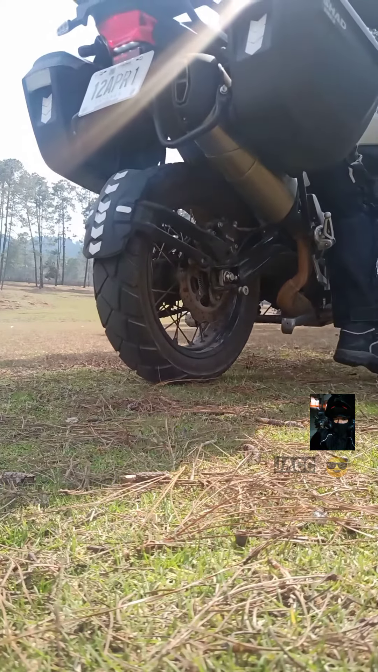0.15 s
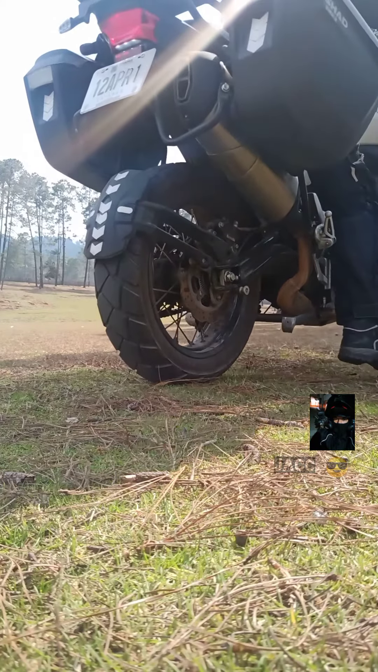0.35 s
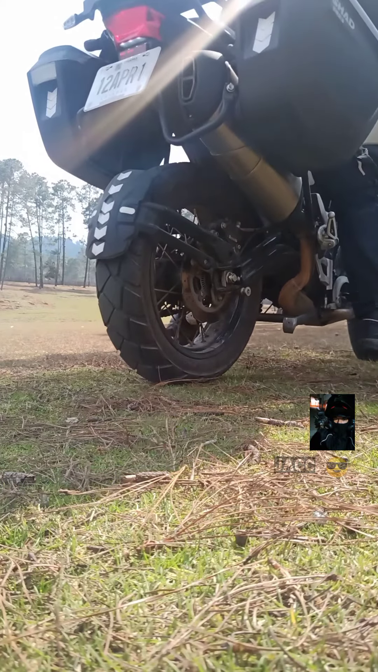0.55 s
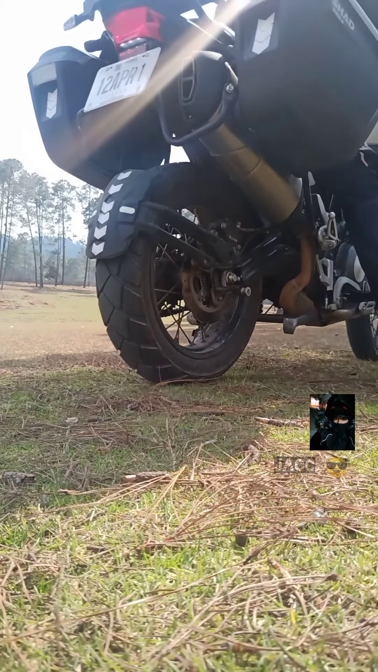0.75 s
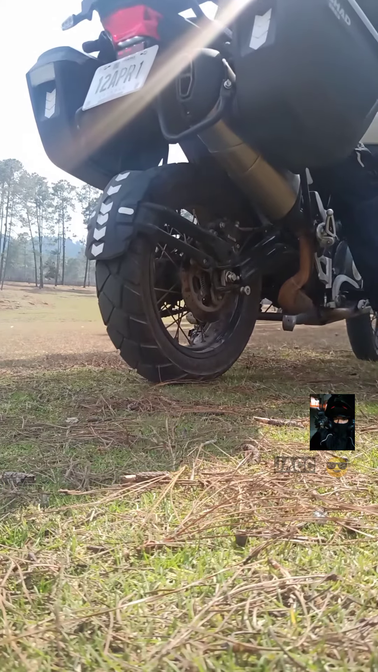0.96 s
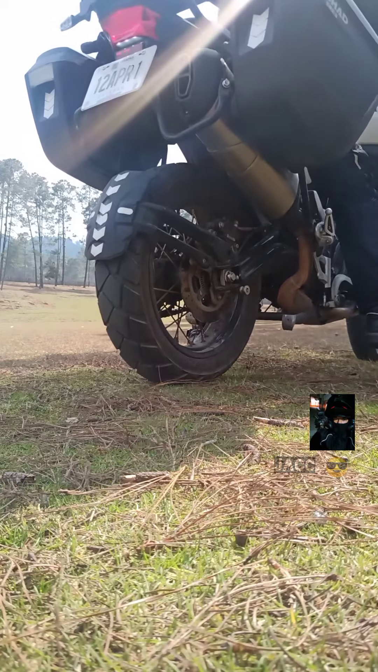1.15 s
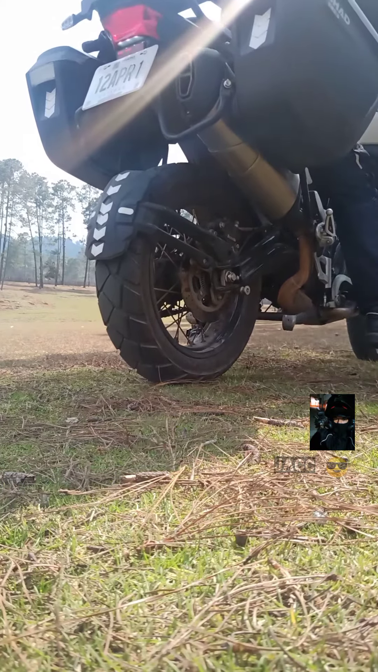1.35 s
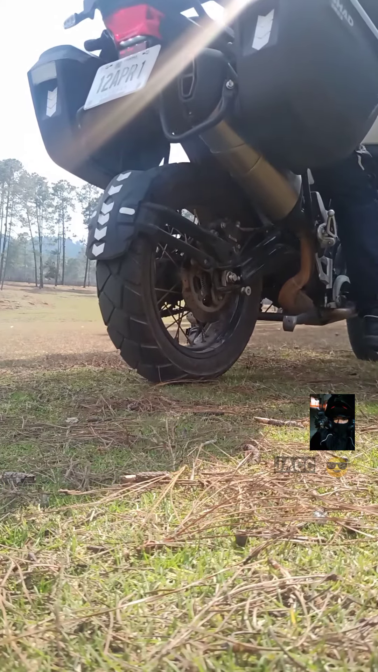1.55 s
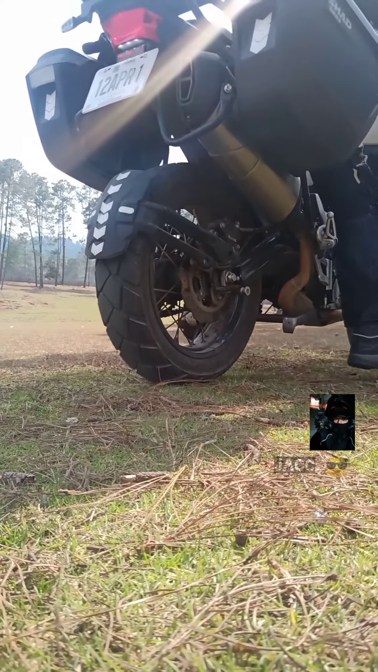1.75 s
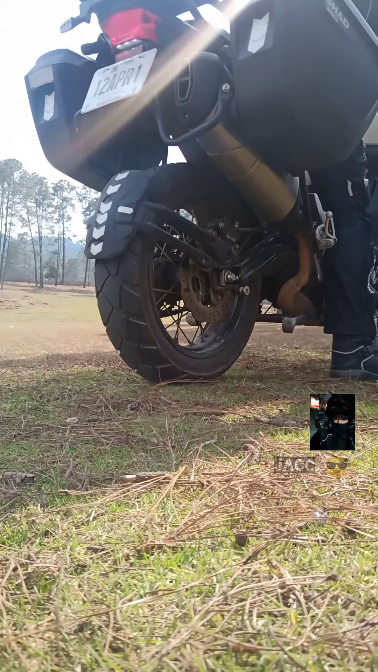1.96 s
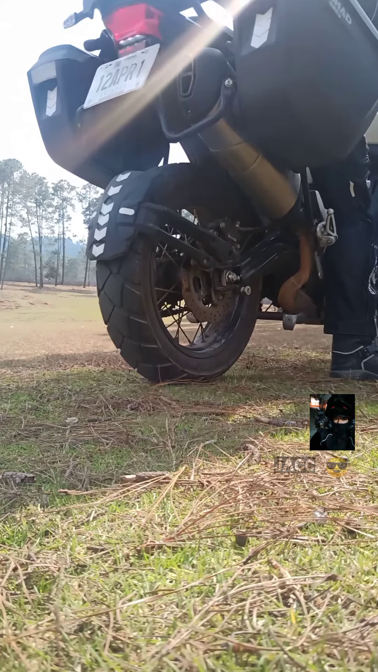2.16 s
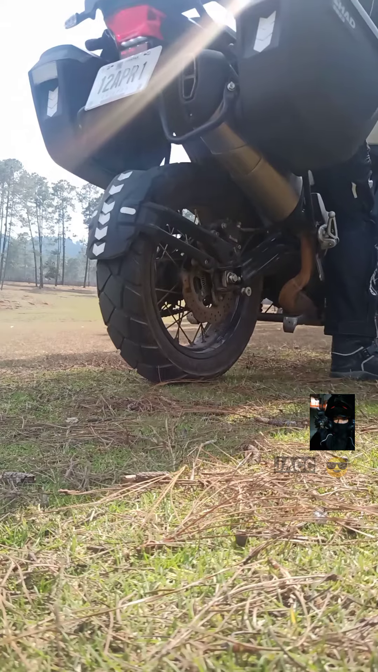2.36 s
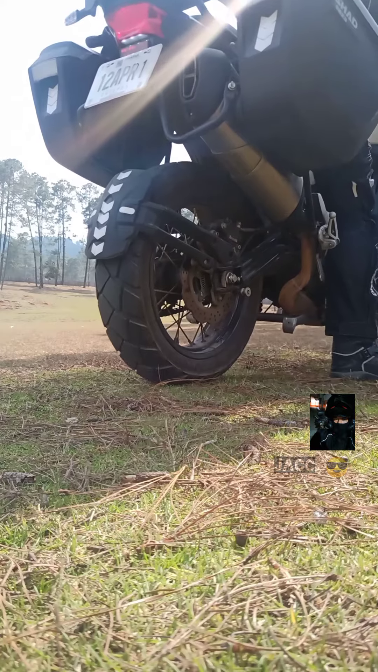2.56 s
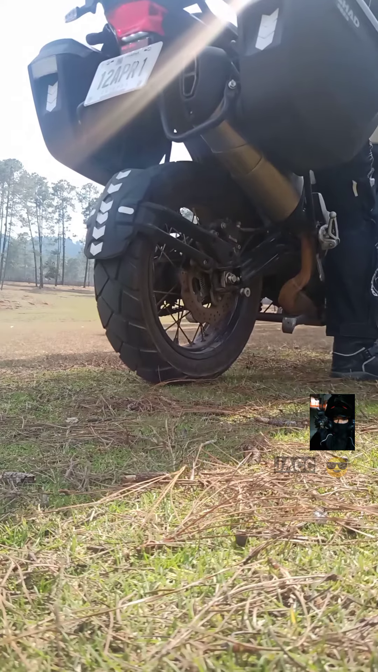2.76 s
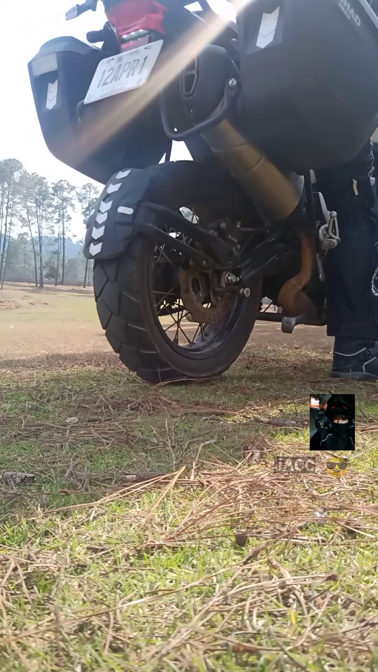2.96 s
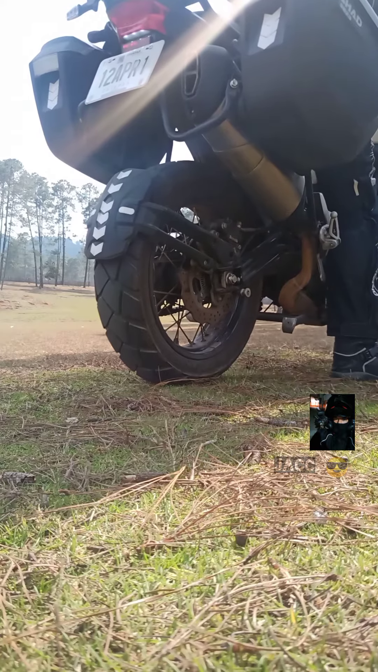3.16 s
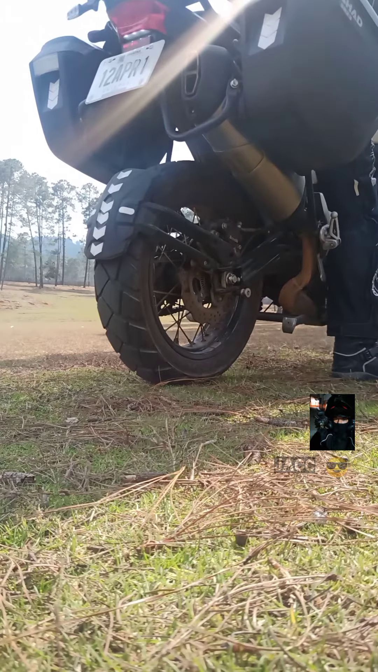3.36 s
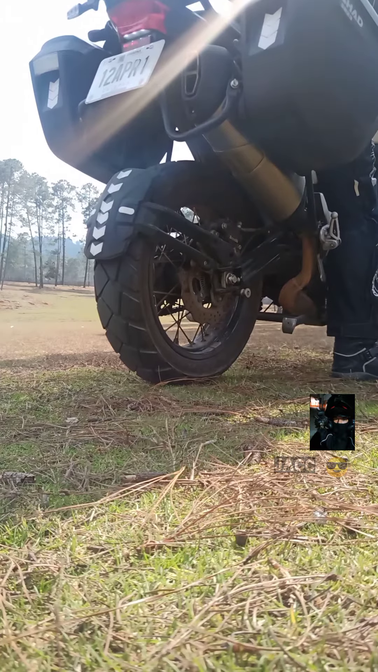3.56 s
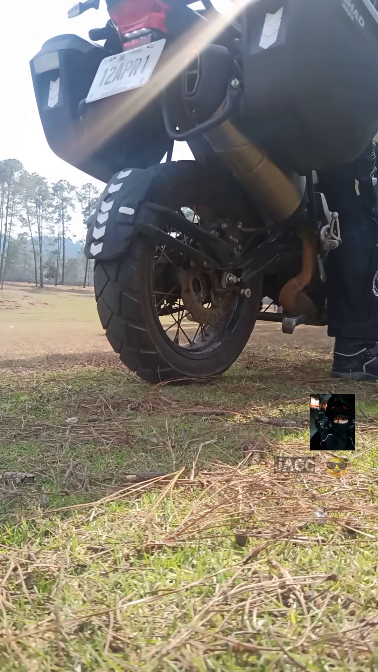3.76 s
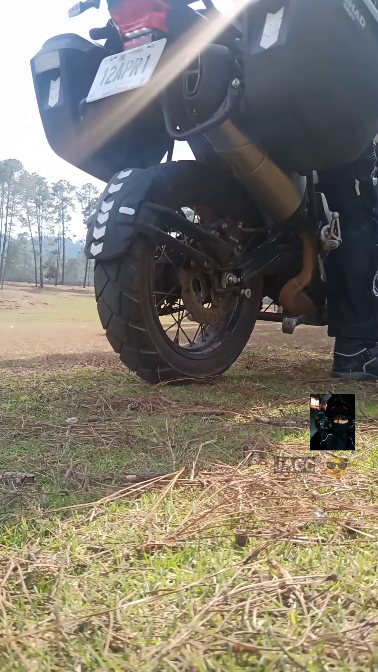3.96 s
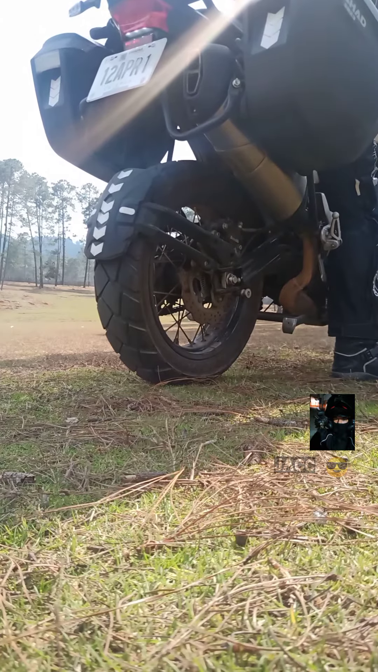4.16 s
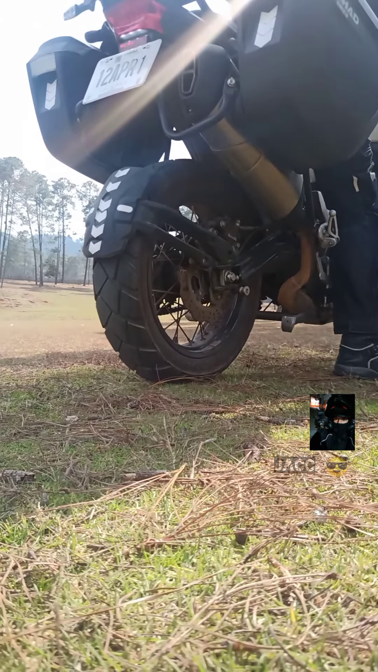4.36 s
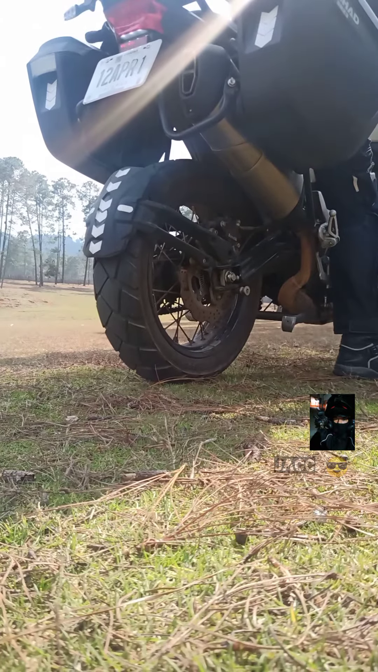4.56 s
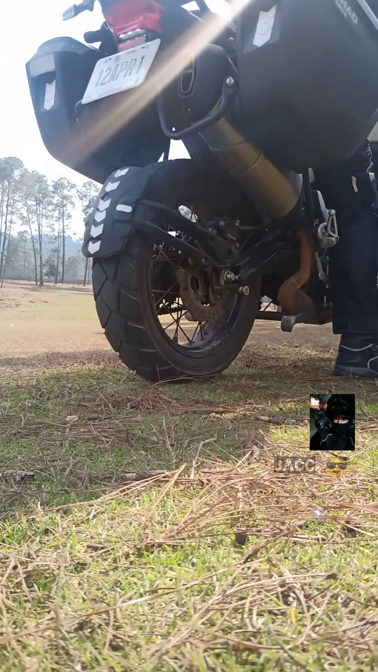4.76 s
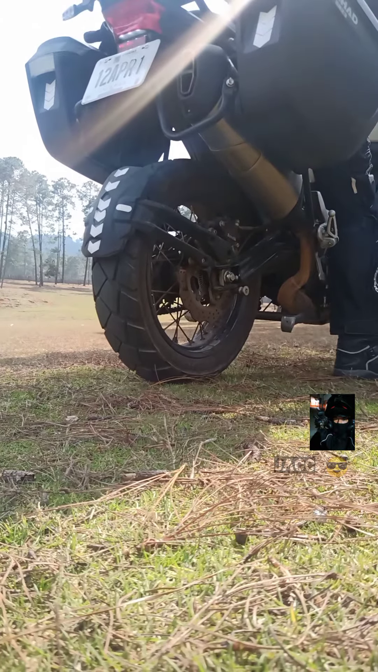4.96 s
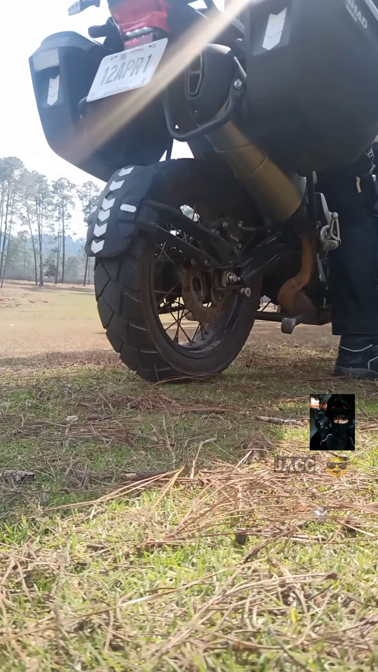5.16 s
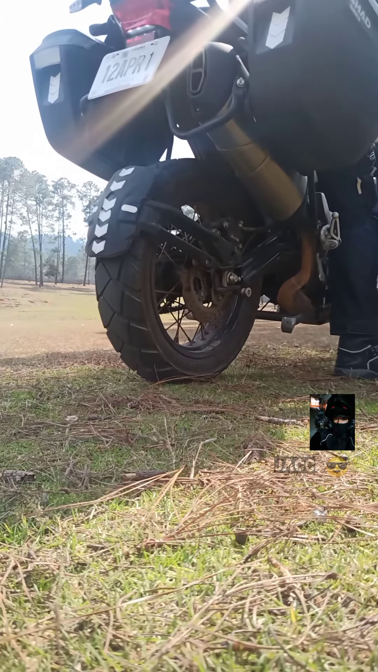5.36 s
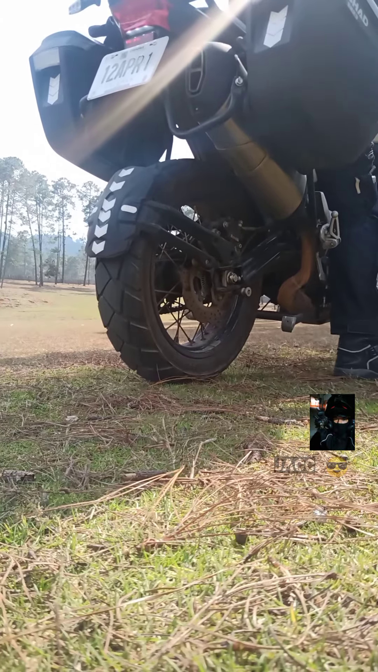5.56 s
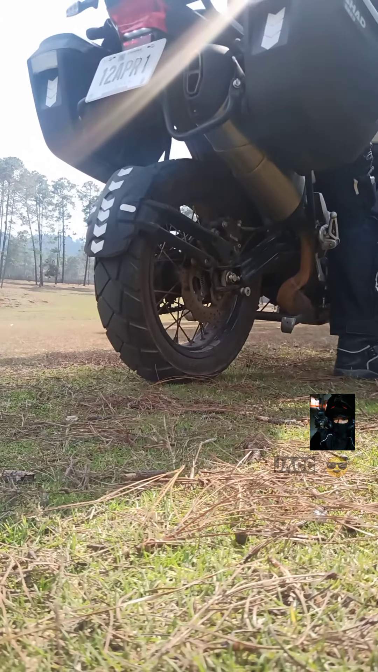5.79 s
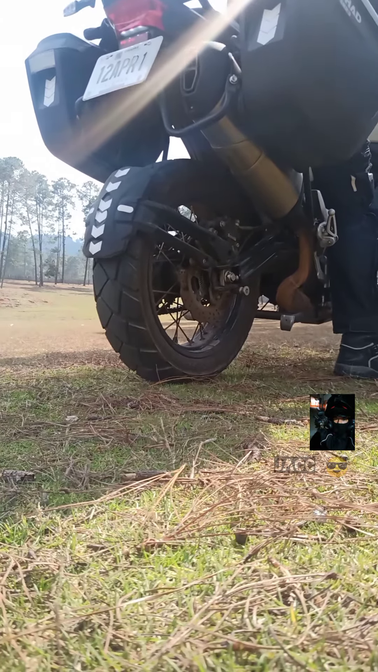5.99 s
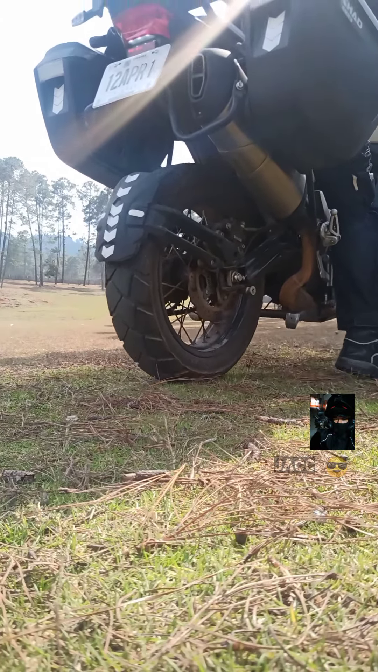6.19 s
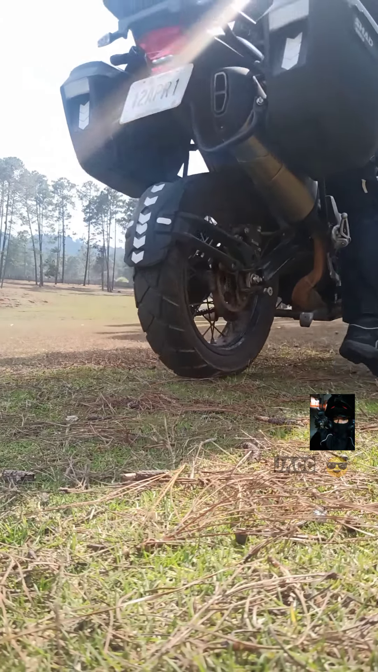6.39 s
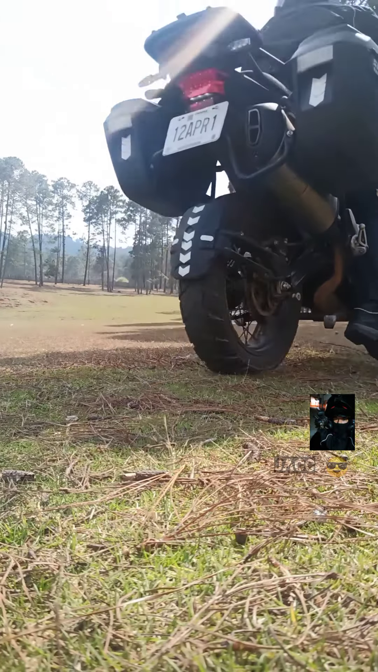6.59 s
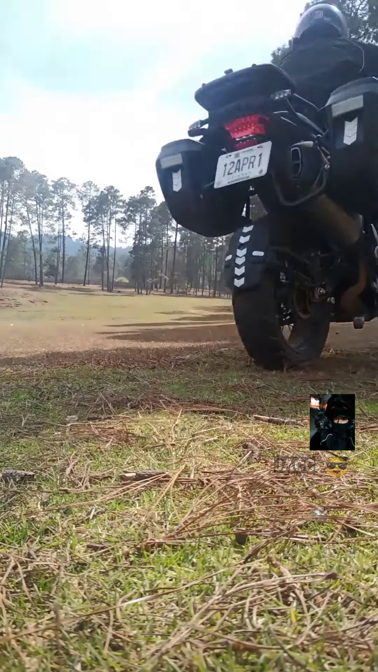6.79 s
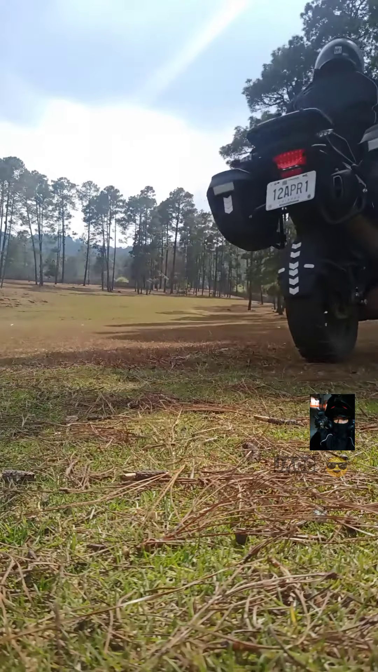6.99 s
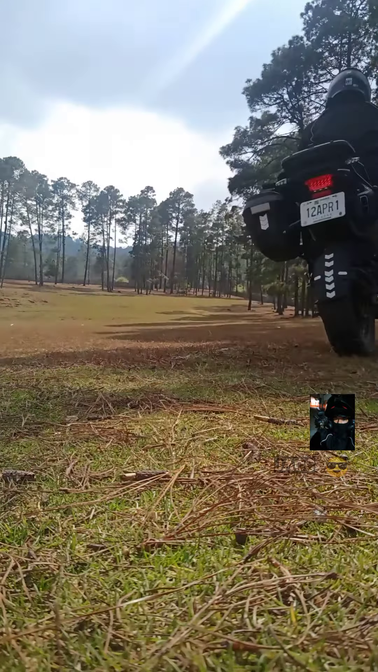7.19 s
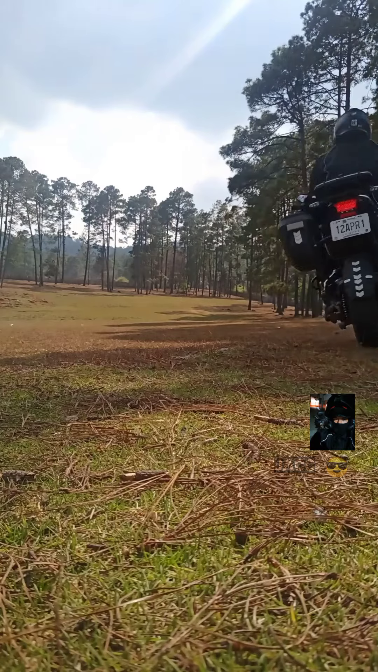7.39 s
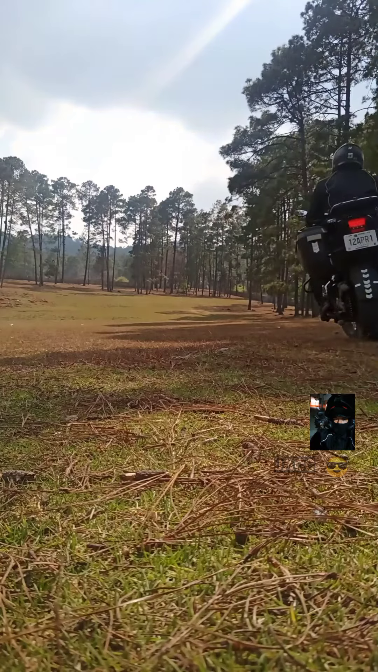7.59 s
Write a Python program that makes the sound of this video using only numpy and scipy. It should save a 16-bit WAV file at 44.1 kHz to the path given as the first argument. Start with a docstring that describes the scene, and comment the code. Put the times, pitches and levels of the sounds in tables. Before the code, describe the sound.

Low twin-cylinder idle thumping with faint metallic ticks, a gear clunk, then a sudden loud throttle burst that eases and recedes outdoors.

```python
"""A twin-cylinder motorcycle idles close by on a field, with a loping beat.
Each firing is an impulse that thumps through the muffler and makes its steel shell ping.
First gear clunks in: shaped noise bursts and a ringing drive line. Then the throttle opens and
the bike rides away on a dense train of firings, its engine sagging and picking up again.
Underneath: lever clicks, an unsteady mechanical murmur and a wash of open air, all from noise."""
import sys
import numpy as np
from scipy import signal
from scipy.fft import rfft, irfft, next_fast_len
from scipy.io import wavfile
from scipy.ndimage import map_coordinates

SR = 44100
rng = np.random.default_rng(int(sys.argv[2]) if len(sys.argv) > 2 else 0)


def unload_audio(sound):
    """Save the sound as a 16-bit wav file, at the path given as the first command line argument."""
    columns = np.transpose(np.atleast_2d(sound))
    # keep every value between -1 and 1, then stretch to whole-number steps
    steps = np.round(np.clip(columns, -1, 1) * 32767)
    wavfile.write(sys.argv[1], SR, steps.astype(np.int16))


N = 336483

# Levels in the tables are relative to the other parts of the same sound.
# idle lopes, each building to a hard firing: t/s of hard firing, thump/dB, ping/dB, firings/count
IDLE_LOPES = [(.035, -30.5, -53, 1), (.106, -29.5, -58.5, 2), (.217, -24.5, -58.5, 2),
              (.365, -25.5, -58.5, 2), (.509, -26, -57.5, 2), (.653, -25, -55, 2), (.805, -26, -55.5, 2),
              (.953, -22, -52.5, 2), (1.098, -26.5, -55, 2), (1.245, -25, -57.5, 2),
              (1.397, -23.5, -58.5, 2), (1.542, -22, -55, 2), (1.689, -26, -56, 3), (1.803, -29, -60, 2),
              (1.956, -22, -54.5, 3), (2.107, -27, -57, 2), (2.257, -26.5, -53, 2), (2.408, -27, -56, 2),
              (2.555, -25.5, -57, 2), (2.702, -23, -55, 2), (2.849, -25.5, -52.5, 2), (2.998, -23, -53, 3),
              (3.074, -21.5, -51.5, 1), (3.152, -22, -52.5, 2), (3.227, -25, -53.5, 2),
              (3.303, -23, -54, 2), (3.457, -25, -56, 3), (3.608, -28.5, -54, 2), (3.753, -23, -55.5, 3),
              (3.865, -26, -52.5, 2), (4.013, -22.5, -57.5, 2), (4.158, -23, -48, 2), (4.350, -22, -51, 2),
              (4.499, -22, -58, 2), (4.645, -23, -60, 2), (4.792, -23.5, -52, 2), (4.942, -23, -54, 2),
              (5.090, -21.5, -51.5, 2), (5.231, -21.5, -53.5, 3), (5.381, -26, -58, 2),
              (5.529, -24.5, -56, 2), (5.674, -21.5, -52.5, 2), (5.818, -23.5, -58, 2),
              (6.004, -19.5, -51, 3)]
# firing rate under throttle: t/s, rate/Hz
FIRING_RATE_HZ = [(6.03, 28.6), (6.14, 37.4), (6.214, 40.6), (6.382, 46.4), (6.773, 43.85), (7.011, 38.9),
                  (7.314, 28), (7.63, 35.4)]
# muffler response to one firing: f/Hz, level/dB
MUFFLER_RESPONSE = [(15, -49.5), (28, -35), (40, -25), (52, -8), (70, -5), (84, 3.5), (95, 3.5), (110, -8),
                    (130, -14), (172, -11.5), (195, -17.5), (225, -36), (400, -50), (1200, -96)]
# modes of the muffler's steel shell: f/Hz, level/dB, t60/s
SHELL_MODES = [(1530, -12, .1), (1656, -21, 0.15), (1995, -22.5, 0.15), (2337, -14.5, 0.099),
               (2790, -18.5, .07), (3170, -15.5, 0.1), (3470, -12, 0.062), (4140, 1, 0.043),
               (4300, -8, 0.019), (4657, 4, 0.034), (4800, -0.5, 0.055), (5060, -3.5, 0.02),
               (5225, -1.5, 0.044), (5284, -10.5, 0.066)]
# resonances of the gas in the pipe: f/Hz, level/dB, t60/s
PIPE_MODES = [(241, -2, 0.2), (327, 1, 0.057), (462, -4.5, 0.14), (699, 2.5, 0.04), (819, -1.5, 0.049),
              (892, -4, 0.073)]
# ringing of gearbox and drive line: f/Hz, level/dB, t60/s
DRIVE_MODES = [(131, 2.5, 0.14), (321, 4.5, 0.075), (392.5, -1, 0.16), (687, -1.5, 0.11), (775, -5, 0.2),
               (1107, -13, 0.21), (1460, -2.5, 0.084), (1800, -12, .18)]
# bands of the idle murmur: f/Hz, damping width/Hz, level/dB
MURMUR_BANDS = [(352, 45, 0), (485, 41, -9), (815, 140, -1.5), (1050, 26, -9), (1400, 380, -6),
                (1690, 57, -14), (2240, 320, -19.5)]

# noise spectra: f/Hz, level/dB
CRACK_SPECTRUM = [(900, -24.5), (1550, -10.5), (1900, -17), (2300, -10.5), (2650, -13), (3100, -5),
                  (3800, -7), (4300, 4), (5200, -2), (6200, -20), (8000, -41.5), (13500, -31.5),
                  (15200, -15.5)]  # bright crack with each firing, plus thin top hiss
RASP_SPECTRUM = [(150, -13.5), (320, 1), (440, -2), (540, -15), (700, -4), (880, -0.5), (1030, -15.5),
                 (1250, -28.5), (1550, -15.5), (2300, -24.5), (8000, -64.5)]  # gas in the exhaust
REAR_TICK_SPECTRUM = [(1200, -15.5), (1950, -18.5), (2280, 0.5), (2650, -20), (3050, -6), (3500, -24),
                      (4150, -9.5), (4550, -18.5), (5050, 2.5), (5600, -7), (6500, -16.5), (8300, -45),
                      (13500, -30.5), (15200, -15.5)]  # narrow-band ticks from behind, plus thin top hiss
GEARBOX_SPECTRUM = [(100, -2.5), (300, 0), (540, -3.5), (780, -2.5), (1150, -9.5), (1450, -6), (2400, -17),
                    (3500, -11.5), (4900, -12), (6400, -27.5), (8000, -41), (12600, -38), (15500, -24.5)]  # gear engagement
MURMUR_SPECTRUM = [(150, -32.5), (250, 1.5), (353, -6.5), (410, -17), (537, -13.5), (817, -13),
                   (1150, -18.5), (1530, -18.5), (2550, -26.5), (3770, -23), (4130, -21.5), (4720, -21),
                   (5410, -25), (6090, -43.5), (9000, -51), (11700, -78), (19800, -120)]  # mechanical murmur
AIR_SPECTRUM = [(20, 14.5), (200, 4), (500, -1.5), (900, -3), (1400, -9), (5500, -24), (8000, -33),
                (13500, -34.5), (15300, -19)]  # open air
DRONE_SPECTRUM = [(25, -11.5), (55, -5), (100, 8.5), (135, 1), (185, -0.5), (230, -21.5), (400, -68)]
JET_SPECTRUM = [(8, 7), (25, -5.5), (60, -13), (200, -31), (500, -71)]
CLICK_SPECTRUM = [(300, -2), (1500, 7), (3000, 6.5), (5500, 1), (8000, -33), (15000, -30.5)]

# exhaust parts under load: full level/dB, at first firing/dB, once eased/dB, per distance doubling/dB
BOOM_LOAD_DB = (-18.5, -5.5, -1, -9)
BARK_LOAD_DB = (-23.5, -17, -10.5, -4)
RASP_LOAD_DB = (-43.5, -24.5, -3, -10.5)
TICK_LOAD_DB = (-51.5, 0.5, 1.5, -11)
# from tailpipe to microphone: t/s, distance/m
DISTANCE_M = [(6.5, 1.527), (6.78, 2.07), (7.0, 3.33), (7.6, 8.85)]
# turn of the bike away from side-on: t/s, turn/quarter-turn
TURN_QUARTERS = [(6.45, 0.028), (6.8, 0.76)]
# metal clicks of the controls: t/s, crack/dB, ring/dB, ring f/Hz
LEVER_CLICKS = [(0.4428, -52, -55, 2420), (0.459, -62.5, -67, 2100), (4.399, -50.5, -49.5, 1340)]
# mechanical murmur: t/s, level/dB
MURMUR_LEVEL_DB = [(0, 1), (5.9, -0.5), (6.3, 14), (7.0, 2.5), (7.6, -5)]
# open-air wash: t/s, level/dB
AIR_LEVEL_DB = [(0, -67.5), (5.9, -70), (6.5, -62), (7.0, -58), (7.6, -58)]

IDLE_GAP_S = 0.037  # nominal; sets the number of firings between hard ones
BUILD_DB, AFTER_DB = 5, -19  # step per firing in a lope; first firing after the hard one
FEEBLE_DB, FEEBLE_PING_DB = -50, -66.5  # firings in the lulls
LEAD_PING_DB = 1  # extra ping on the firings before the hard one
GO_S, SWELL_S = 6.04, 0.034  # first firing under throttle; exhaust response time
EASE_S, EASE_OVER_S = 6.59, 0.053  # rider eases off: start, duration
HOT_GAS = 1.057  # frequency factor on the muffler's resonances under load
GEAR_S = 4.2245
TOP_HZ = 15870


def idle():
    """Uneven firings thump, ping the shell and puff gas; the silencer drones on between them."""
    s, thump_db, ping_db = idle_firings()
    sizes = amp(thump_db)
    firings = pulses(s, sizes)

    leak = amp(-19.5) * pulses(s - 0.0105, sizes)  # gas slips out as the valve starts to lift
    boom = deep_part(ring(firings + leak, muffler()))
    # hard firings add mostly boom, so the soft ones sound hollower
    evened_sizes = amp(-25) * np.tanh(amp(thump_db + 30.5))
    evened = ring(pulses(s, evened_sizes), muffler())
    thumps = amp(-1) * (boom + evened - deep_part(evened))

    drone_envelope = ring(firings, burst(delay_s=0.0051, rise_s=0.016, t60_s=0.56))
    drone = amp(-26) * drone_envelope * noise(DRONE_SPECTRUM)

    pings = amp(3.5) * strikes(s + 0.0017, amp(ping_db), SHELL_MODES,
                               scatter_db=6.5, phase_scatter_rad=np.pi, detune=0.025)
    crack_envelope = ring(pulses(s, amp(ping_db)), burst(delay_s=0, rise_s=0.0028, t60_s=0.018))
    crack = amp(-6) * crack_envelope * noise(CRACK_SPECTRUM)

    puff_envelope = ring(firings, burst(delay_s=0.001, rise_s=0.0032, t60_s=0.058))
    puffs = amp(-39) * puff_envelope * noise(RASP_SPECTRUM)
    return thumps + drone + pings + crack + puffs


def idle_firings():
    """Times, thump dB and ping dB at idle: lopes build to a hard firing, feeble ones fill the lulls."""
    hard_s, hard_db, hard_ping_db, firings = np.transpose(IDLE_LOPES)
    hard = np.append(0, np.cumsum(np.round(np.diff(hard_s) / IDLE_GAP_S)))
    beat = np.arange(hard[-1] + 1)
    chance = rng.standard_normal((len(beat), 3))
    lope = np.searchsorted(hard, beat)
    to_go = hard[lope] - beat  # firings left before the hard one
    in_lope = to_go < np.round(firings[lope])

    after_hard = np.isin(beat - 1, hard)
    lull_db = np.where(after_hard, hard_db[lope - 1] + AFTER_DB, FEEBLE_DB) + 3.4 * chance[:, 0]
    lope_db = hard_db[lope] - BUILD_DB * to_go + 0.42 * chance[:, 2]
    thump_db = np.where(in_lope, lope_db, lull_db)
    lope_ping_db = hard_ping_db[lope] + LEAD_PING_DB * (to_go > 0)
    ping_db = np.where(in_lope, lope_ping_db, FEEBLE_PING_DB) + 2.3 * chance[:, 1]
    return np.interp(beat, hard, hard_s), thump_db, ping_db


def ride():
    """Under throttle the firings run together: the muffler booms and barks, gas rasps with each one."""
    boom_db, bark_db = under_load(*BOOM_LOAD_DB), under_load(*BARK_LOAD_DB)
    rasp_db, tick_db = under_load(*RASP_LOAD_DB), under_load(*TICK_LOAD_DB)
    t = np.arange(N) / SR
    s = ride_firings()
    chance = rng.standard_normal((len(s), 3))
    s = s + 0.00006 * chance[:, 0]

    cylinder = (-1) ** np.arange(len(s))  # one cylinder fires a little harder
    firing_sizes = amp(0.65 * chance[:, 1] + 0.22 * cylinder)
    exhaust = ring(pulses(s, firing_sizes), muffler(HOT_GAS))
    # the boom swells whenever a multiple of the firing rate meets the muffler's resonance
    boom = deep_part(exhaust)
    body = amp(boom_db) * boom + amp(bark_db) * levelled(exhaust - boom)
    # gas buffets the microphone
    jet = amp(boom_db - 25.5) * (t > GO_S) * noise(JET_SPECTRUM)

    shock_sizes = amp(2 * chance[:, 2])
    shocks = pulses(s, shock_sizes)
    pipe_strikes = strikes(s + 0.00094, amp(chance[:, 1]), PIPE_MODES,
                           scatter_db=4.5, phase_scatter_rad=0.62, detune=0.0036)
    pipe = levelled(chambers(pipe_strikes))
    gas_envelope = levelled(ring(shocks, burst(delay_s=0.00084, rise_s=0.0033, t60_s=0.1)))
    gas = gas_envelope * noise(RASP_SPECTRUM)
    rasp = amp(rasp_db) * (amp(2) * pipe + amp(-7.5) * gas)

    steel = levelled(strikes(s + 0.001022, shock_sizes, SHELL_MODES,
                             scatter_db=10.5, phase_scatter_rad=np.pi, detune=0.027))
    spit = levelled(ring(shocks, burst(delay_s=0.00059, rise_s=0.0011, t60_s=0.065)))
    side_on = amp(-2) * steel + amp(-2.5) * spit * noise(CRACK_SPECTRUM)
    from_behind = spit * noise(REAR_TICK_SPECTRUM)
    # as the bike turns away, pings and crack give way to the ticks from behind
    turn_rad = np.pi / 2 * curves(TURN_QUARTERS)[0]
    ticks = amp(tick_db) * (np.cos(turn_rad) * side_on + np.sin(turn_rad) * from_behind)
    return body + jet + ticks + rasp


def ride_firings():
    """Firing times in s under throttle: one at each whole count of the integrated firing rate."""
    t = np.arange(N) / SR
    rate_hz, = curves(FIRING_RATE_HZ)
    count = np.cumsum(rate_hz) / SR
    count -= np.interp(GO_S, t, count)
    return np.interp(np.arange(int(count[-1]) + 1), count, t)


def under_load(full_db, first_db, eased_db, doubling_db):
    """Level in dB of one exhaust part: swells with throttle, drops on easing, fades with distance."""
    t = np.arange(N) / SR
    opening = np.exp(-np.maximum(t - GO_S, 0) / SWELL_S)
    eased = np.clip((t - EASE_S) / EASE_OVER_S, 0, 1)
    metres, = curves(DISTANCE_M)
    doublings = np.log2(metres / metres[0])
    return full_db + first_db * opening + eased_db * eased + doubling_db * doublings


def muffler(heat=1, size=16384):
    """One firing at the tailpipe: minimum-phase response of a few dying cycles, peak 1."""
    hz = np.fft.rfftfreq(size, 1 / SR)
    cepstrum = irfft(np.log(amp(along(MUFFLER_RESPONSE, hz / heat))))
    # folding the cepstrum puts the energy as early as possible
    cepstrum[1:size // 2] *= 2
    cepstrum[size // 2 + 1:] = 0
    thump = -irfft(np.exp(rfft(cepstrum)))
    return thump / thump.max()


def deep_part(x):
    """The muffler's main boom, without its upper resonances."""
    return filtered(x, lambda hz: 1 / (1 + (hz / 112) ** 12))


def chambers(x, notch_hz=548, leak=0.1):
    """The silencer's chambers nearly cancel the rasp at every multiple of one frequency."""
    return filtered(x, lambda hz: leak + np.sin(np.pi * hz / notch_hz) ** 2)


def gearbox():
    """First gear engages with a noise slam, a rattle and a knock; a faint tick comes 12 ms before it."""
    blow = pulses(np.array([GEAR_S]), [1.])
    early = pulses(np.array([GEAR_S - 0.012]), [1.])
    tick = amp(-49.5) * ring(early, burst(delay_s=0, rise_s=0.00069, t60_s=0.012))
    slam = amp(-29) * ring(blow, burst(delay_s=0, rise_s=0.0011, t60_s=0.065))
    rattle = amp(-44) * ring(blow, burst(delay_s=0.014, rise_s=0.0049, t60_s=0.14))
    knock = strikes([GEAR_S + 0.0011], [amp(-27.5)], DRIVE_MODES,
                    scatter_db=1.5, phase_scatter_rad=0.79, detune=0.0034)
    return (tick + slam + rattle) * noise(GEARBOX_SPECTRUM) + knock


def clicks():
    """Each lever click is a short crack with a narrow band of ringing."""
    out = np.zeros(N)
    crack = noise(CLICK_SPECTRUM)
    for s, crack_db, ring_db, ring_hz in LEVER_CLICKS:
        band = filtered(rng.standard_normal(N), lambda f: 1 / (1 + ((f - ring_hz) / 170) ** 2))
        envelope = ring(pulses(np.array([s]), [1.]), burst(delay_s=0, rise_s=0.0019, t60_s=0.065))
        out += envelope * (amp(ring_db) * unit(band) + amp(crack_db) * crack)
    return out


def murmur():
    """Unsteady mechanical murmur: noise through broad and narrow bands."""
    level_db, = curves(MURMUR_LEVEL_DB)
    bands = np.zeros(N)
    for centre_hz, width_hz, db in MURMUR_BANDS:
        def resonance(f):
            damping = (f * width_hz) ** 2
            return damping / ((centre_hz ** 2 - f ** 2) ** 2 + damping)
        band = filtered(rng.standard_normal(N), resonance)
        bands += amp(db) * unit(amp(6 * wobble(18)) * band)
    rustle = amp(-71 + 4.9 * wobble(25)) * noise(MURMUR_SPECTRUM)
    return amp(level_db) * (amp(-74.5) * bands + rustle)


def field():
    """Open air: a gently unsteady noise wash that grows as the bike draws off."""
    level_db, = curves(AIR_LEVEL_DB)
    return amp(level_db + 0.8 * wobble(4.4)) * noise(AIR_SPECTRUM)


def strikes(times_s, sizes, modes, scatter_db, phase_scatter_rad, detune, count=4000):
    """Each blow rings the same modes at new strengths and slightly new pitches, for count samples."""
    hz, db, t60_s = np.transpose(modes)
    t = np.arange(count) / SR
    fades = np.exp(-np.log(1000) * t / t60_s[:, None]) * (1 - np.exp(-(t / 0.0016) ** 2))
    chance = rng.standard_normal((len(times_s), 3, len(hz)))
    gains = amp(db + scatter_db * chance[:, 0])
    gains *= (np.asarray(sizes) / np.linalg.norm(gains, axis=1))[:, None]
    blow_hz = hz * (1 + detune * chance[:, 2])
    phases = 2 * np.pi * blow_hz[..., None] * t + phase_scatter_rad * chance[:, 1, :, None]
    blows = np.einsum("bm,mt,bmt->bt", gains, fades, np.sin(phases.astype(np.float32)))
    where = np.round(np.asarray(times_s) * SR).astype(int)[:, None] + np.arange(count)
    return np.bincount(where.ravel(), blows.ravel(), N)[:N]


def burst(delay_s, rise_s, t60_s):
    """An envelope of peak 1 that swells and dies."""
    t = np.maximum(np.arange(SR // 3) / SR - delay_s, 0)
    shape = (1 - np.exp(-(t / rise_s) ** 2)) * np.exp(-np.log(1000) * t / t60_s)
    return shape / shape.max()


def pulses(times_s, sizes):
    """One impulse at each time."""
    return np.bincount(np.clip(np.round(times_s * SR).astype(int), 0, N), sizes, N + 1)[:N]


def ring(x, answer):
    """Every impulse of x sets off the answer."""
    return signal.fftconvolve(x, answer)[:N]


def levelled(x):
    """Even out the running rms of x to about 1; a power floor keeps near-silence quiet."""
    window = np.hanning(SR // 8)
    power = np.abs(signal.fftconvolve(x ** 2, window / window.sum(), "same"))
    return x / np.sqrt(power + power.max() / 1000)


def noise(spectrum):
    """Coloured noise of rms 1."""
    return unit(filtered(rng.standard_normal(N), lambda hz: amp(along(spectrum, hz))))


def wobble(rate_hz):
    """A smooth random curve through rate_hz knots a second."""
    knots = rng.standard_normal(int(N * rate_hz / SR) + 4)
    return map_coordinates(knots, [np.arange(N) * rate_hz / SR])


def filtered(x, response):
    """x times a response of frequency."""
    m = next_fast_len(N + SR // 2)
    return irfft(rfft(x, m) * response(np.fft.rfftfreq(m, 1 / SR)), m)[:N]


def curves(rows):
    """One value per sample for each column after the time."""
    s, *cols = np.transpose(rows)
    return [np.interp(np.arange(N) / SR, s, c) for c in cols]


def along(points, hz):
    """(Hz, value) points read on a log frequency axis."""
    f, v = np.transpose(points)
    return np.interp(np.log(hz + 1), np.log(f + 1), v)


def amp(db):
    """Decibels to gain."""
    return 10 ** (np.asarray(db) / 20)


def unit(x):
    """Scale to rms 1."""
    return x / np.sqrt(np.mean(x ** 2) + 1e-20)


def scene():
    """The bike and the field around it."""
    return (idle() + ride() + gearbox() + clicks() + murmur() + field())[None]


def record(dry):
    """The microphone channel passes nothing above its band limit."""
    return filtered(dry[0], lambda hz: hz < TOP_HZ)[None]


dry = scene()
out = record(dry)
unload_audio(out)
```